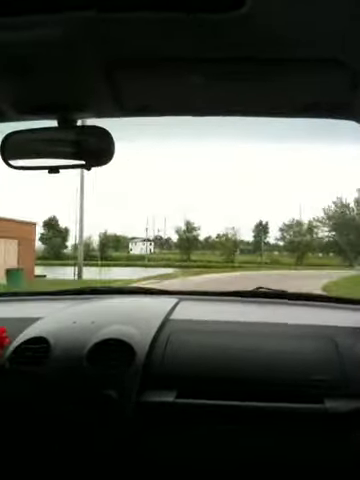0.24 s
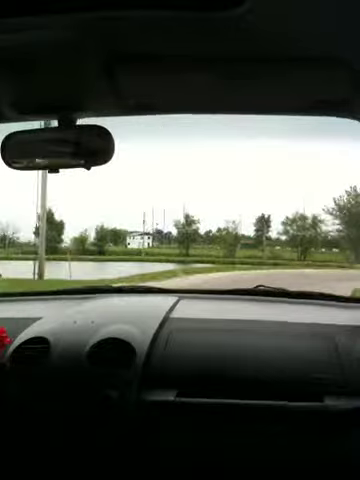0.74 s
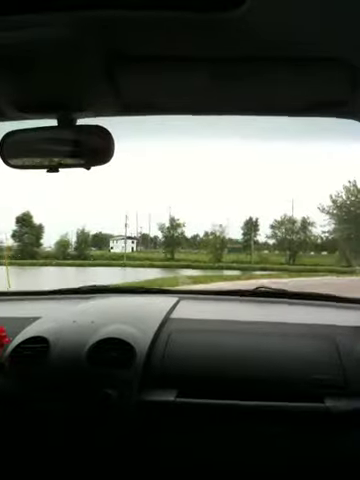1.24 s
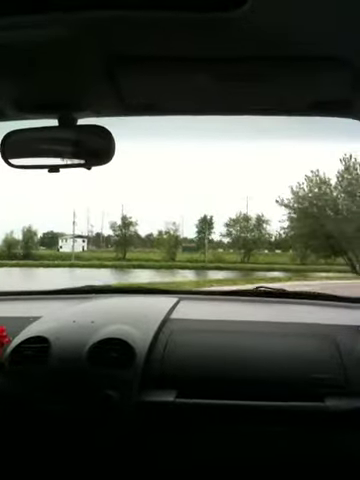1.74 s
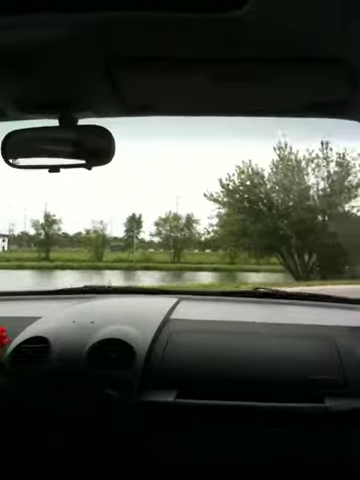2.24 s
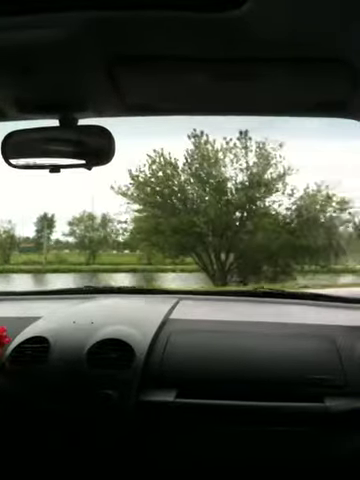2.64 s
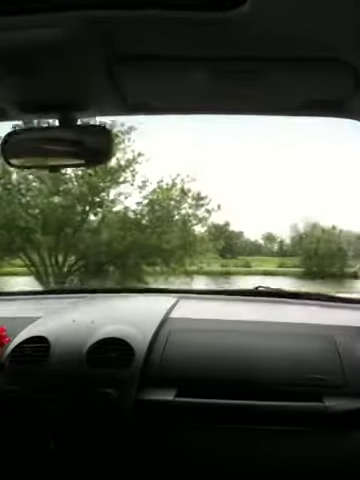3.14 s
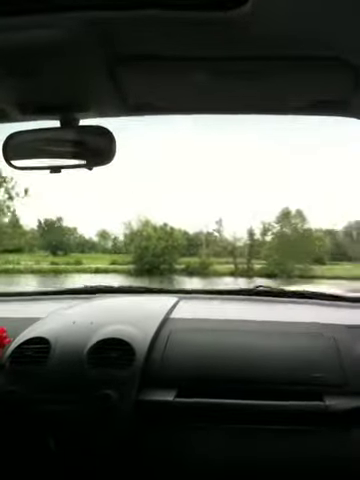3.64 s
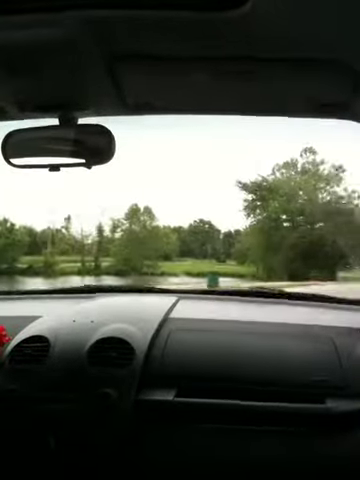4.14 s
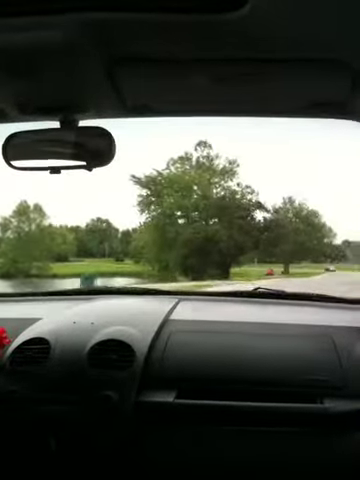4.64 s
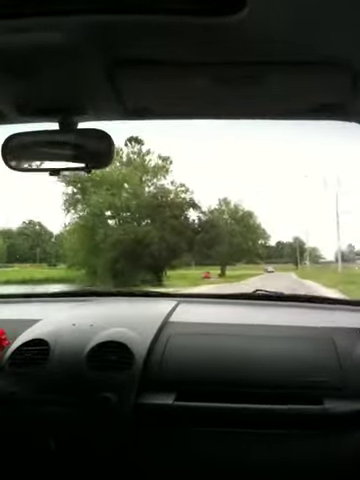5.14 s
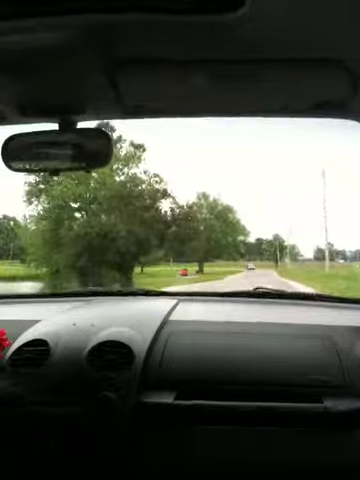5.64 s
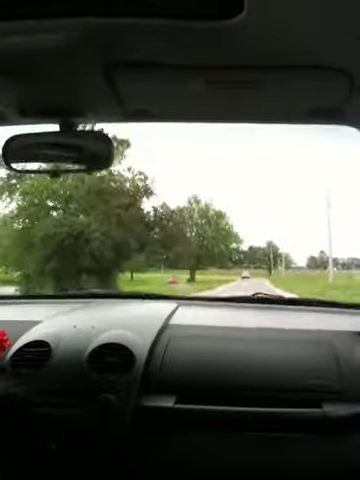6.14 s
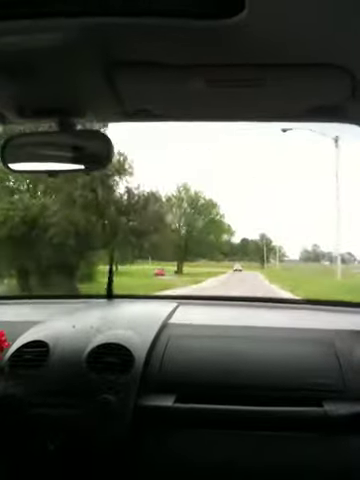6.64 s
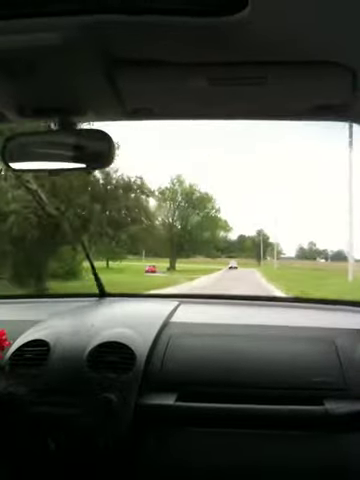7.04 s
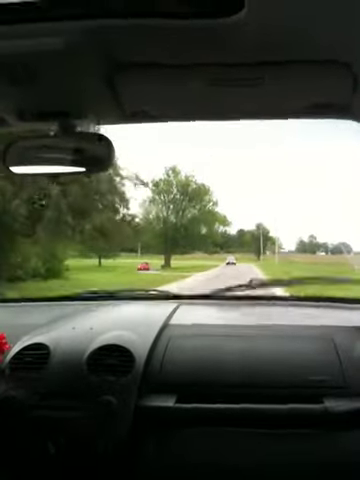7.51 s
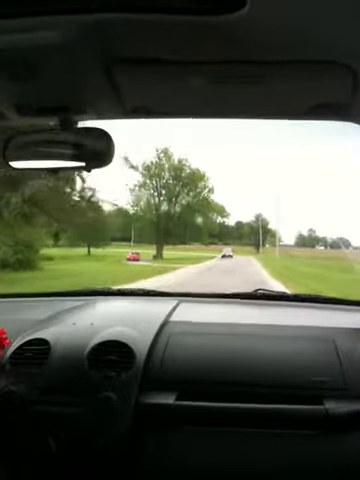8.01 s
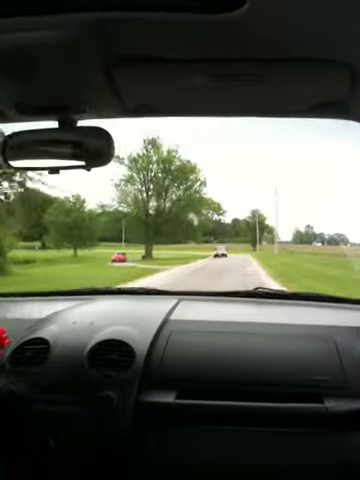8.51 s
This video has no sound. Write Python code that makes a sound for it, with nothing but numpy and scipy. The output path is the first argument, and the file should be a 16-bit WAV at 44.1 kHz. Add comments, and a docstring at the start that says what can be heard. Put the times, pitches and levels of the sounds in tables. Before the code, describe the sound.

Inside a small car on a rough road, a loose holder knocks dully in clusters while thin plastic buzzes sharply over low tyre rumble.

```python
"""A knock opens the scene, then more: a microphone holder bounces on its seat in a small car on a rough road.
Each knock strikes decaying modes under a crunch of slips, and a boom near 130 Hz follows the shaking.
A loose plastic part buzzes in bursts, one sharp ringing tick per swing of the holder.
Below lie tyre rumble in wavering noise bands, a stretch of engine hum as an unsteady tone, microphone hiss,
and dense noise grains: a short rustle near 3.6 s and a brief fizz at 3.88 s."""
import sys
import numpy as np
from scipy import signal
from scipy.io import wavfile

SR = 44100
rng = np.random.default_rng(int(sys.argv[2]) if len(sys.argv) > 2 else 0)


def makeup_ratio(level_db):
    """Linear amplitude ratio for a level in decibels (20 dB per factor of ten)."""
    decades = np.asarray(level_db, float) / 20
    return 10 ** decades


def master_out(mix):
    """Clip the mix to full scale and print it as 16-bit PCM to the path in sys.argv[1]."""
    frames = np.transpose(np.atleast_2d(mix))
    ceiling = np.clip(frames, -1, 1)
    pcm = np.round(ceiling * 32767).astype(np.int16)
    wavfile.write(sys.argv[1], SR, pcm)


N = 386757  # length in samples


def rms_one(x):
    """Scales to rms 1."""
    return x / np.sqrt(np.mean(x ** 2) + 1e-20)


def in_time(rows):
    """Draws straight lines between the rows of a curve; one array per column after the time."""
    s, *columns = np.transpose(rows)
    return [np.interp(np.arange(N) / SR, s, column) for column in columns]


def smooth(x, hz):
    """Double one-pole low-pass, a soft treble roll-off."""
    r = np.exp(-2 * np.pi * hz / SR)
    return signal.lfilter([(1 - r) ** 2], [1, -2 * r, r * r], x)


def filtered(x, hz, kind):
    """Butterworth filter with a second-order prototype, high-pass or band-pass."""
    return signal.sosfilt(signal.butter(2, hz, kind, fs=SR, output="sos"), x)


def ring(clicks, hz, t60_s):
    """A resonance: a unit click sets off a sine of starting height 1 that falls 60 dB in t60_s."""
    r = makeup_ratio(-60 / (t60_s * SR))
    w = 2 * np.pi * hz / SR
    return signal.lfilter([0, np.sin(w)], [1, -2 * r * np.cos(w), r * r], clicks + 1e-18)


def strike(modes, start_s, level_db, spread_db):
    """Every blow strikes each mode of the body with a strength of its own."""
    at = np.clip((start_s * SR).astype(int), 0, N - 1)
    out = np.zeros(N)
    chance = rng.standard_normal((len(at), len(modes)))
    for k, (hz, mode_db, t60_s) in enumerate(modes):
        clicks = np.zeros(N)
        np.add.at(clicks, at, makeup_ratio(level_db + mode_db + spread_db * chance[:, k]))
        out += ring(clicks, hz, t60_s) * (-1) ** k  # neighbouring modes have opposite signs
    return out


def at_random(per_s, level_db, size_db):
    """Moments and levels of small blows that come by chance."""
    born = rng.random(N) < per_s / SR
    sizes = rng.exponential(1, N)
    levels_db = level_db + size_db * np.minimum(sizes, 3)
    return np.flatnonzero(born) / SR, levels_db[born]


def jolt_db(s, level_db, before_s, after_s):
    """Level of the jostling around each blow: it swells before the blow and dies away after it."""
    marks = np.zeros(N)
    marks[np.minimum(s * SR, N - 1).astype(int)] = makeup_ratio(level_db)
    t = np.arange(-.3, .3, 1 / SR)
    shape = np.exp(-abs(t) / np.where(t < 0, before_s, after_s))
    return 20 * np.log10(abs(signal.fftconvolve(marks, shape, "same")) + 1e-4)


# Spectrum of the tyres through the floor: pitch_hz [Hz], relative density_db [dB per Hz]
TYRE_SPECTRUM = [(25, -28.5), (62, -5), (90, -4.5), (140, 3), (210, -5), (300, -26.5), (640, -33.5),
                 (1140, -65), (2500, -61)]


def tyres(shaking_db, patchy_db):
    """Half-octave bands of noise, each wavering on its own, a little louder on rough road."""
    out = 0
    edges = 25 * 2 ** np.arange(0, 7.1, .5)
    white = rng.standard_normal((2, N))
    hz, density_db = np.transpose(TYRE_SPECTRUM)
    for k, (low, high) in enumerate(zip(edges, edges[1:])):
        band = filtered(white[k % 2], [low, high], "band")
        waver = rms_one(smooth(rng.standard_normal(N), hz=5.6))
        band_db = np.interp(np.log(low * high) / 2, np.log(hz), density_db)
        out = out + band * makeup_ratio(band_db + patchy_db * waver)
    return makeup_ratio(-41 + 0.23 * (shaking_db - shaking_db.mean())) * rms_one(out)


# Course of the engine hum: start_s [s], pitch_hz [Hz], level_db [dB]
ENGINE_HUM = [(2.2, 100, -49), (2.75, 99, -44), (3.2, 97, -47), (3.95, 92, -42), (4.1, 80, -49),
              (4.6, 85.5, -40.5), (5.2, 86.5, -43), (5.9, 90, -41), (6.1, 90, -51)]


def engine():
    """One firing order stands out as a slightly unsteady tone, with a faint octave."""
    hz, level_db = in_time(ENGINE_HUM)
    unsteady_db = 2.1 * rms_one(smooth(rng.standard_normal(N), hz=4.2))
    unsteady_hz = 1.293 * rms_one(smooth(rng.standard_normal(N), hz=4.3))
    phase = 2 * np.pi * np.cumsum(hz + unsteady_hz) / SR
    tone = np.sin(phase) + makeup_ratio(-14.0) * np.sin(2 * phase)
    return np.sqrt(2) * makeup_ratio(level_db + unsteady_db) * tone


# Swells of the grains, a rustle near 3.6 s and then a brief fizz in the last row:
# peak_s [s], relative level_db [dB], rise_s [s], fall_s [s]
GRAIN_SWELLS = [(3.536, -53.5, 0.0026, 0.0064), (3.593, -50, 0.0076, 0.013), (3.643, -53, 0.027, 0.037),
                (3.88, -53, 0.0059, 0.022)]


def rustle_and_fizz():
    """Dense noise grains in short swells: a broad body, a faint ring near 4 kHz and a high sheen."""
    grain_db = 4.0 * rms_one(smooth(rng.standard_normal(N), hz=120.0))
    grains = rng.standard_normal((2, N)) * makeup_ratio(grain_db)
    body = filtered(grains[0], [900.0, 4900.0], "band")
    sheen = filtered(grains[1], [6200.0, 10500.0], "band")
    ringing = ring(grains[1], 3740.0, 0.0023)
    t = np.arange(N) / SR
    swells = sum(makeup_ratio(level_db) * np.exp(-abs(t - peak_s) / np.where(t < peak_s, rise_s, fall_s))
                 for peak_s, level_db, rise_s, fall_s in GRAIN_SWELLS)
    return swells * rms_one(body + makeup_ratio(-4.0) * sheen + makeup_ratio(-17.0) * ringing)


# Bumps that set the holder bouncing: start_s [s], relative level_db [dB], knocks [count], gap_s [s]
ROAD_BUMPS = [(.001, -15, 2, 0.014), (.055, -18.5, 1, .04), (.114, -22.5, 3, 0.063),
              (.319, -22.5, 2, 0.0063), (.417, -25.5, 2, 0.046), (.533, -23.5, 3, 0.031),
              (.65, -21, 1, .04), (.713, -24, 2, 0.0071), (.772, -23, 1, .04), (.801, -25, 2, 0.015),
              (.856, -21.5, 2, 0.029), (.981, -28, 2, 0.031), (1.101, -19, 3, 0.031), (1.243, -18, 2, .031),
              (1.357, -25.5, 3, 0.045), (1.517, -25, 2, 0.026), (1.737, -28, 3, .036),
              (1.956, -23.5, 3, 0.039), (2.209, -31, 1, .04), (2.412, -31, 2, 0.027), (2.925, -32, 1, .04),
              (3.017, -31, 2, 0.025), (3.227, -26, 2, .02), (3.323, -29.5, 2, 0.046),
              (3.453, -21, 2, 0.022), (3.561, -24.5, 2, 0.036), (3.603, -23, 1, .04),
              (3.633, -21.5, 3, 0.024), (3.737, -20.5, 2, 0.042), (3.902, -17, 4, 0.035),
              (4.215, -27.5, 1, .04), (4.262, -17, 2, 0.029), (4.399, -34.5, 4, 0.051),
              (4.571, -32.5, 1, .04), (4.72, -38, 3, 0.059), (4.916, -22, 3, 0.032), (5.154, -21.5, 1, .04),
              (5.217, -20, 2, .028), (5.348, -21.5, 2, 0.062), (5.702, -21.5, 2, 0.036),
              (5.879, -19.5, 2, 0.046), (5.946, -11.5, 2, 0.025), (6.001, -17, 4, 0.044),
              (6.164, -15.5, 3, 0.03), (6.279, -19, 7, 0.043), (6.564, -35, 1, .04),
              (6.607, -15.5, 2, 0.029), (6.678, -20, 2, 0.037), (6.74, -20, 2, .042), (6.832, -15, 2, .041),
              (6.971, -20.5, 3, 0.056), (7.215, -18.5, 2, 0.059), (7.314, -19.5, 4, 0.039),
              (7.503, -18, 4, 0.036), (7.662, -14.5, 2, 0.037), (7.746, -18, 2, 0.046),
              (7.854, -19, 1, .04), (7.904, -17, 4, 0.039), (8.097, -25, 2, .012), (8.226, -31.5, 1, .04),
              (8.39, -16, 2, 0.019), (8.439, -24.5, 3, 0.044), (8.656, -24, 2, 0.1)]


def knocks():
    """Moments and levels of the bump knocks: each bump is an even run of nearly equal bounces."""
    chance = rng.standard_normal((len(ROAD_BUMPS), 8))
    blows = []
    for row, (start_s, level_db, count, gap_s) in enumerate(ROAD_BUMPS):
        for k in range(max(round(count), 1)):
            blows.append((start_s + k * gap_s, level_db + 0.5 * chance[row, k] * (k > 0)))
    return np.transpose(blows)


# Roughness of the road between bumps: start_s [s], shaking level_db [dB]
ROAD_ROUGHNESS = [(0, -26.5), (.9, -49), (1.15, -40), (1.55, -29), (1.67, -41.5), (1.8, -25), (1.9, -41),
                  (2.3, -53), (2.42, -41), (2.66, -60), (3.4, -39.5), (4.9, -42), (5.2, -40.5), (5.5, -46),
                  (6.06, -32), (8.77, -39)]


def shaking(knock_s, knock_db):
    """Shaking in dB: the road, swelling around bump knocks and buzzes; long buzzes add more."""
    start_s, level_db, ticks = np.transpose(BUZZ_BURSTS)
    ticks = np.round(ticks)
    middle_s = start_s + ticks / 2 / np.interp(start_s, *np.transpose(SWING_RATE))
    rise_s, fall_s = 0.042, 0.032
    by_knocks = jolt_db(knock_s, knock_db - 18, rise_s, fall_s)
    by_buzzes = jolt_db(middle_s, level_db + 5 + 0.27 * (ticks - 5.0), rise_s, fall_s)
    power = makeup_ratio(2 * in_time(ROAD_ROUGHNESS)[0]) + makeup_ratio(2 * by_knocks) + makeup_ratio(2 * by_buzzes)
    return 10 * np.log10(power)


# Swing rate of the holder, which times the ticks: start_s [s], rate_hz [swings per s]
SWING_RATE = [(0, 118), (3.7, 122.5), (4.2, 138), (6.8, 124.5), (7.3, 133), (8.4, 122), (8.55, 131)]


def swings():
    """Around each buzz the holder swings as a clean tone; ticks are timed just after its crests."""
    out = np.zeros(N)
    for start_s, level_db, ticks in BUZZ_BURSTS:
        per_s = np.interp(start_s, *np.transpose(SWING_RATE))
        first = int((start_s - 3 / per_s) * SR)
        last = int((start_s + (round(ticks) + 3) / per_s) * SR)
        at = np.arange(first, last)
        turns = (at / SR - start_s) * per_s
        swing = np.hanning(len(at)) * np.cos(2 * np.pi * (turns + 0.17))
        out[at] += makeup_ratio(.5 * level_db - 10.0) * swing
    return out


# Buzzes of the loose part: start_s [s], relative level_db [dB], ticks [count, rounded when played]
BUZZ_BURSTS = [(0.059, -42.5, 0.63), (0.1738, -52, 1), (0.1925, -47.5, 5), (0.418, -54, 2.7),
               (0.526, -53, 1.4), (0.6092, -45.5, 2.2), (0.662, -44.5, 2.4), (0.807, -52.5, 3.3),
               (0.8814, -42, 1.4), (0.909, -50.5, 0.65), (0.935, -49, 3.9), (1.031, -49, 1.6),
               (1.1395, -42, 6.9), (1.2577, -50.5, 1.8), (1.3, -44.5, 5), (1.5334, -50, 1),
               (2.005, -46, 2.2), (2.077, -49.5, 0.96), (3.0437, -46, 1.7), (3.0817, -49.5, 1.2),
               (3.233, -47.5, 3.5), (3.276, -44, 3.4), (3.3146, -47, 1.2), (3.349, -43, 3.6),
               (3.692, -50.5, 2), (3.773, -44.5, 2.52), (3.8303, -47.5, 2.6), (3.9448, -45, 0.8),
               (4.0202, -47.5, 2.5), (4.0981, -47.5, 2.0), (4.245, -45.5, 0.69), (4.2657, -39, 8.7),
               (4.35, -46.5, 1.6), (4.644, -53, 1.6), (4.9159, -41, 1.4), (4.9769, -39.5, 6.4),
               (5.2357, -39, 5), (5.415, -45, 1.6), (5.4393, -49.5, 2.4), (5.7506, -48.5, 4),
               (5.9699, -42, 2.7), (5.9964, -35.5, 2.0), (6.09, -38.5, 1.56), (6.1424, -49, 0.64),
               (6.1602, -39, 2.0), (6.185, -43.5, 0.72), (6.3299, -39.5, 2.3), (6.3925, -44, 6),
               (6.446, -46, 1.0), (6.536, -47.5, 2.5), (6.632, -38, 2.8), (6.6925, -42, 7.1),
               (6.9118, -43, 3.54), (7.002, -49.5, 4.2), (7.1385, -45.5, 3.1), (7.236, -41.5, 2),
               (7.3057, -43.5, 2.24), (7.435, -48, 3.6), (7.5313, -43.5, 2.1), (7.6914, -35.5, 3.44),
               (7.785, -43.5, 3.4), (7.8981, -45.5, 2), (7.979, -45, 3.6), (8.0173, -51.5, 1.4),
               (8.4346, -39, 5.3), (8.5364, -45.5, 7.4)]
# Modes a tick sets ringing in the plastic: pitch_hz [Hz], relative level_db [dB], t60_s [s]
PLASTIC_MODES = [(2333, -6, 0.012), (3550, -10, 0.0068), (4620, -1, 0.0046), (5440, -3.5, 0.0025),
                 (8430, 8, 0.0017), (9420, 4, 0.0023), (12500, -13, 0.0014)]


def loose_part(knock_s, knock_db):
    """One tick per swing, strongest in mid-buzz, with two rebounds and a fizz that grow with its force."""
    # faint stray ticks, slightly stronger near knocks
    near_db = jolt_db(knock_s, knock_db, before_s=0.0046, after_s=0.0039)
    s, db = at_random(35.0, 0.14 * near_db - 60.0, size_db=4.0)
    for start_s, level_db, ticks in BUZZ_BURSTS:
        per_s = np.interp(start_s, *np.transpose(SWING_RATE))
        k = np.arange(max(round(ticks), 1))
        arch = np.sin(np.pi * ((k + 1) / (len(k) + 1.7)) ** 0.96)
        chance = rng.standard_normal((2, 12))[:, :len(k)]
        s = np.r_[s, start_s + (k + .015 * chance[0] * (k > 0)) / per_s]
        db = np.r_[db, level_db - 8.5 * (arch.max() - arch) - 1.5 * abs(chance[1])]
    luck = rng.standard_normal((len(s), 4))
    rebound = np.array([1, 2])
    again_s = s[:, None] + 0.0022 * (rebound + .15 * luck[:, :2])
    again_db = db[:, None] + 0.67 * (db[:, None] + 42.0) - 8 * rebound + 4.0 * luck[:, 2:]
    fizz_db = jolt_db(s, 1.287 * db + 64.5, before_s=0.000099, after_s=0.0015) - 77.5
    fizz = makeup_ratio(fizz_db) * rng.standard_normal(N)
    bounces = sum(makeup_ratio(mode_db) * ring(fizz, hz, t60_s) for hz, mode_db, t60_s in PLASTIC_MODES)
    all_s = np.r_[s, again_s.ravel()]
    all_db = np.r_[db, again_db.ravel()] - 2.0
    ticking = strike(PLASTIC_MODES, all_s, all_db, spread_db=2.5)
    # too small to radiate below its first mode
    return filtered(ticking + bounces, 1900.0, "high")


# Modes a knock sets ringing in the holder: pitch_hz [Hz], relative level_db [dB], t60_s [s]
HOLDER_MODES = [(131, -10.5, 0.11), (154, -1.5, 0.081), (214.9, -2.5, 0.056), (298, 1, 0.022),
                (449, -4, 0.017), (649, -10.5, 0.016), (911, -14, 0.0052), (1222, -23.5, 0.0047),
                (1855, -31.5, 0.0036), (2400, -22, 0.0024)]


def holder(s, db, shaking_db):
    """Soft knocks in a crunch of small slips, over a noise-driven low mode that booms with the shaking."""
    # light knocks come by chance, stronger as the shaking grows
    light_s, light_db = at_random(40.0, 0.62 * shaking_db - 15.0, size_db=1.5)
    s, db = np.r_[s, light_s], np.r_[db, light_db]
    thuds = smooth(strike(HOLDER_MODES, s, db - .8, spread_db=2.5), hz=1780.0)
    near_db = jolt_db(s + 0.0027, db, before_s=0.0053, after_s=0.0072)
    slip_s, slip_db = at_random(600.0, near_db - 14.5, size_db=2.5)
    slips = strike(HOLDER_MODES, slip_s, slip_db, spread_db=4.0)
    # a slip is too brief and light to move the low modes
    crunch = filtered(slips, 450.0, "high")
    crunch = makeup_ratio(2.5) * smooth(crunch, hz=2970.0)  # rubbery contact, no sharp edge
    boom = rms_one(ring(rng.standard_normal(N), 133.6, 0.13))
    return thuds + crunch + makeup_ratio(shaking_db - 5.5) * boom


def scene():
    """All sources at one microphone."""
    knock_s, knock_db = knocks()
    shaking_db = shaking(knock_s, knock_db)
    mix = holder(knock_s, knock_db, shaking_db) + loose_part(knock_s, knock_db)
    mix = mix + tyres(shaking_db, patchy_db=2.5) + engine() + rustle_and_fizz() + swings()
    return mix[None]


def low_pass(x):
    """Removes everything above the highest recorded frequency."""
    return signal.sosfilt(signal.butter(12, 15840, fs=SR, output="sos"), x)


def record(dry):
    """The microphone cuts the deep bass and adds its hiss."""
    hiss = makeup_ratio(-74) * rms_one(rng.standard_normal(N))
    bass_cut = signal.butter(4, 78.0, "high", fs=SR, output="sos")
    mix = signal.sosfilt(bass_cut, dry) + hiss
    return low_pass(mix)


dry = scene()
out = record(dry)
master_out(out)
```